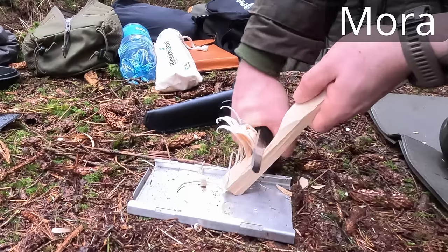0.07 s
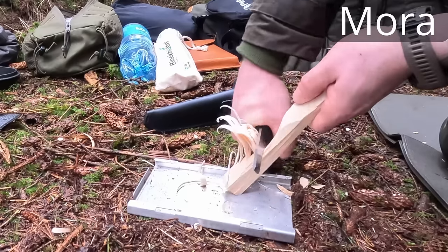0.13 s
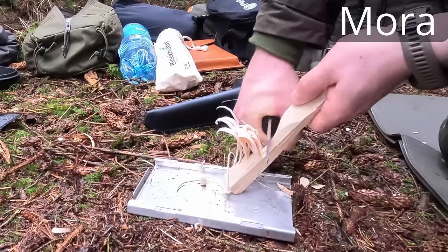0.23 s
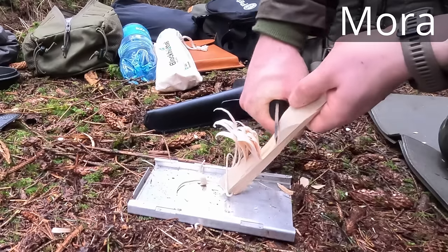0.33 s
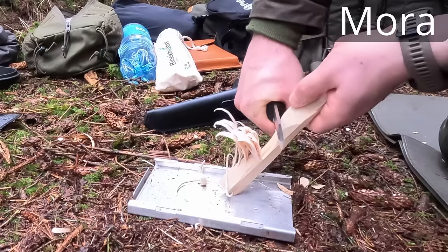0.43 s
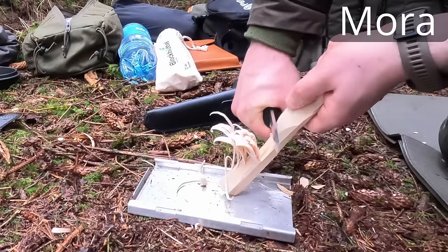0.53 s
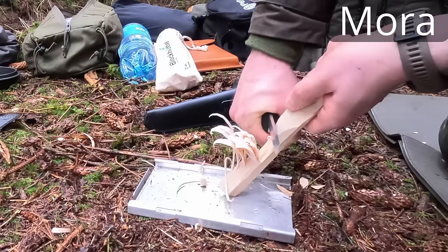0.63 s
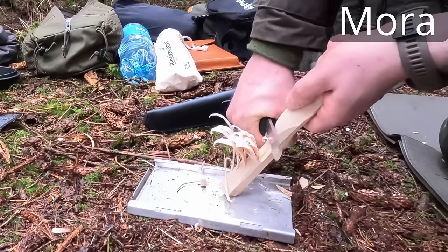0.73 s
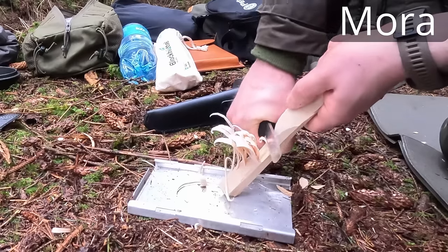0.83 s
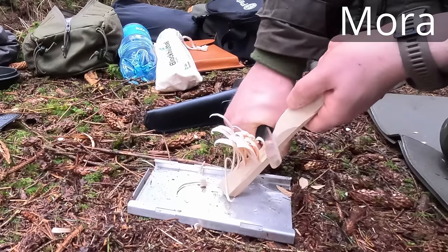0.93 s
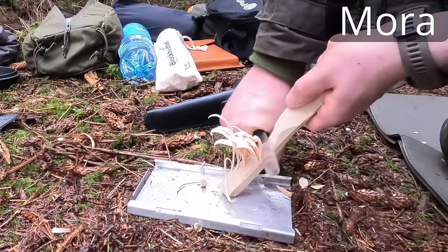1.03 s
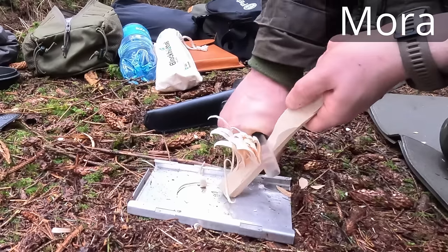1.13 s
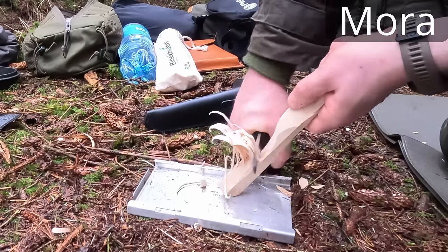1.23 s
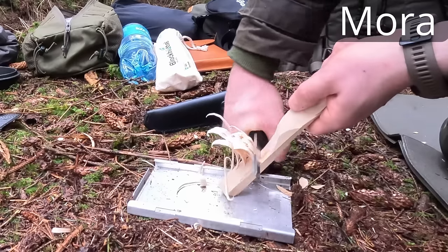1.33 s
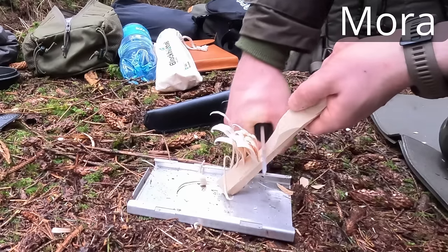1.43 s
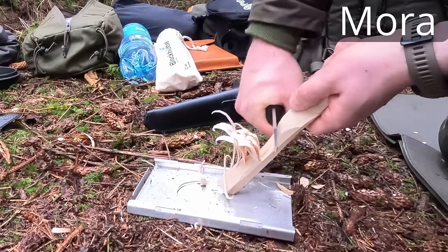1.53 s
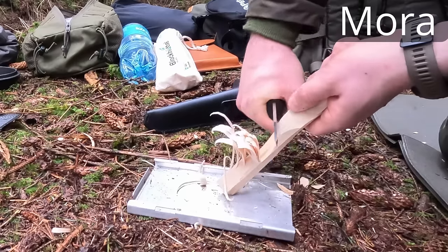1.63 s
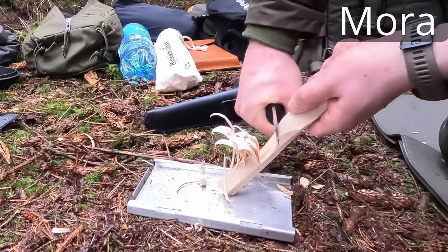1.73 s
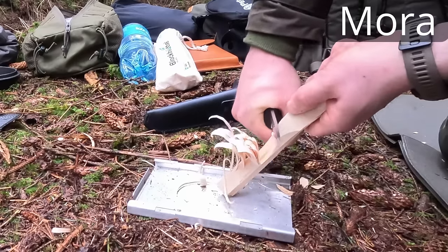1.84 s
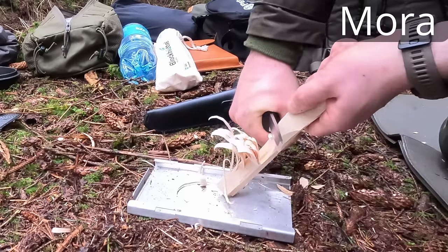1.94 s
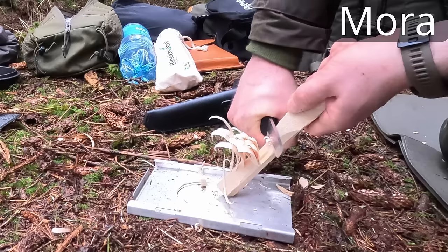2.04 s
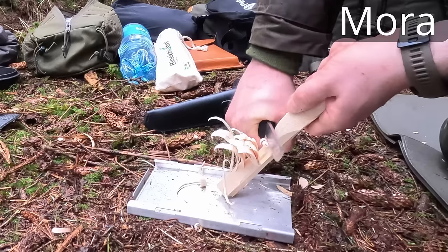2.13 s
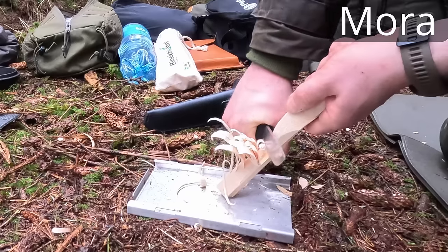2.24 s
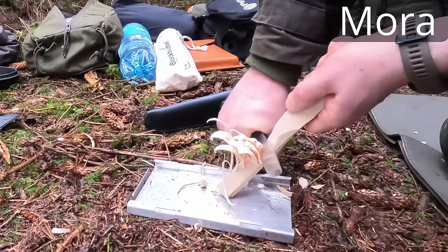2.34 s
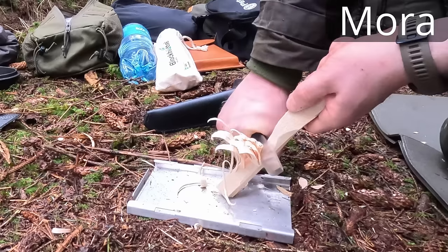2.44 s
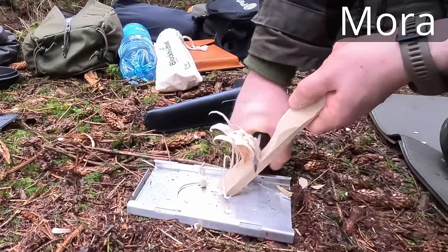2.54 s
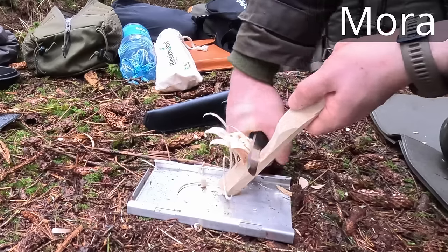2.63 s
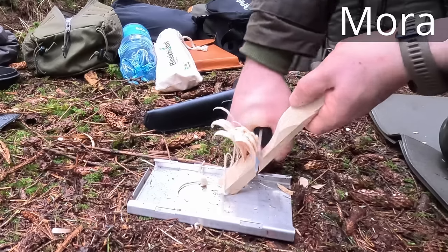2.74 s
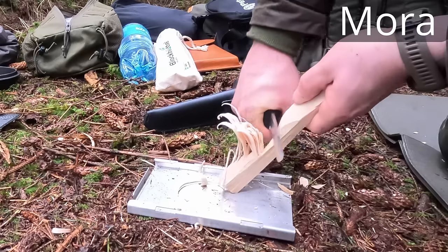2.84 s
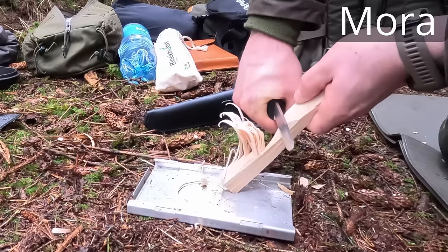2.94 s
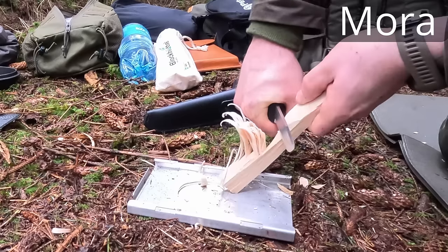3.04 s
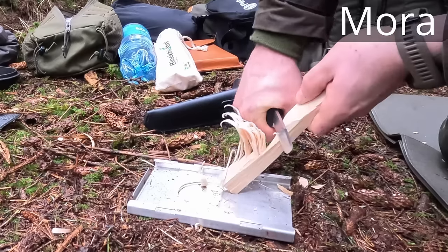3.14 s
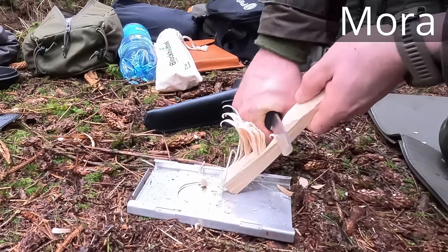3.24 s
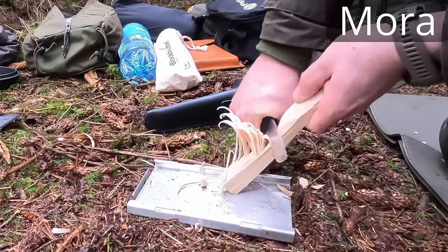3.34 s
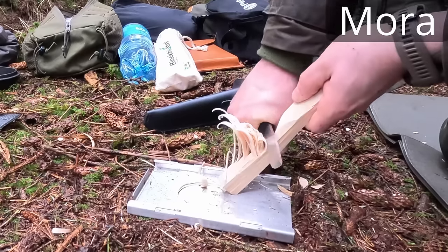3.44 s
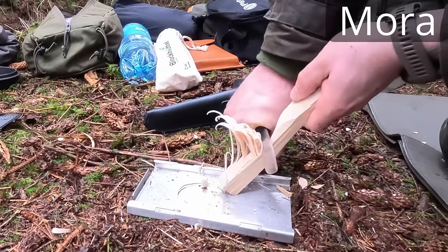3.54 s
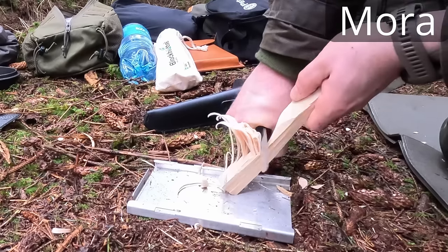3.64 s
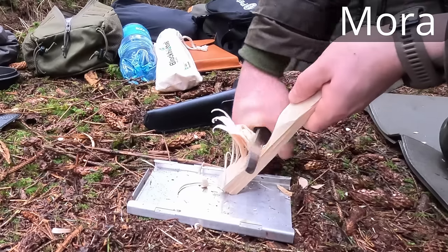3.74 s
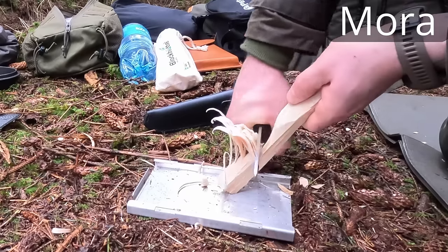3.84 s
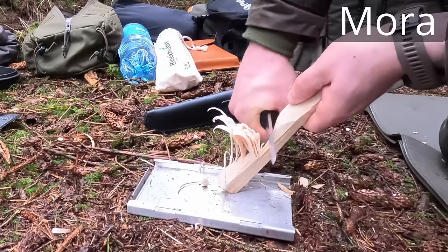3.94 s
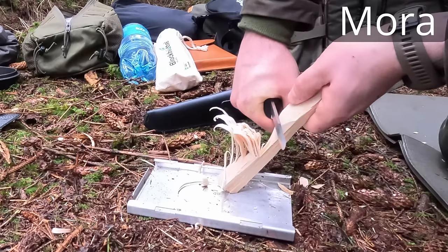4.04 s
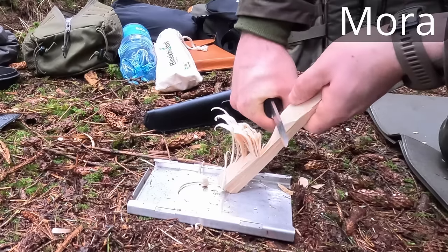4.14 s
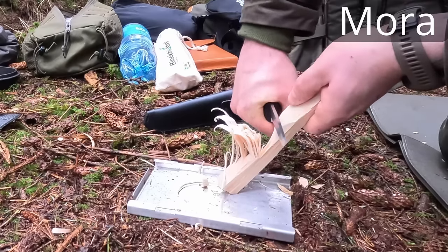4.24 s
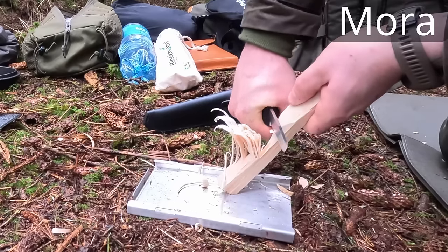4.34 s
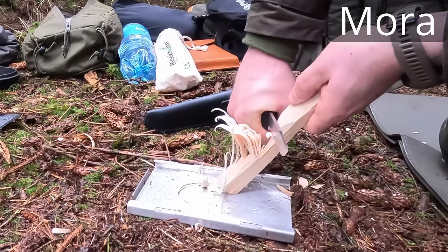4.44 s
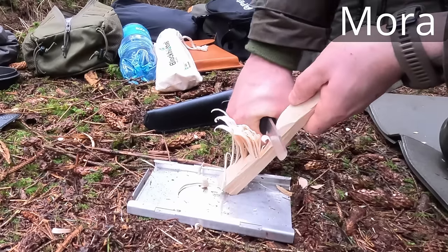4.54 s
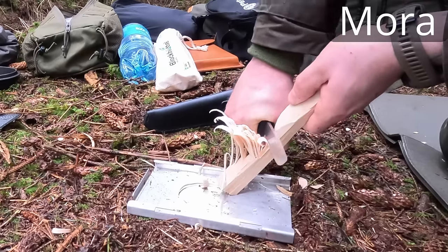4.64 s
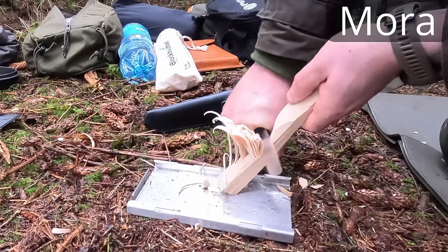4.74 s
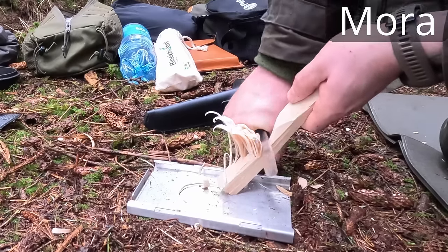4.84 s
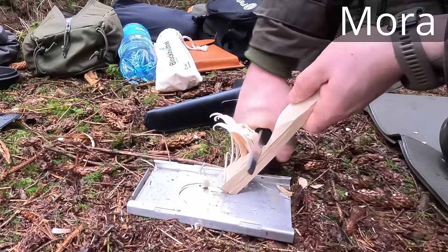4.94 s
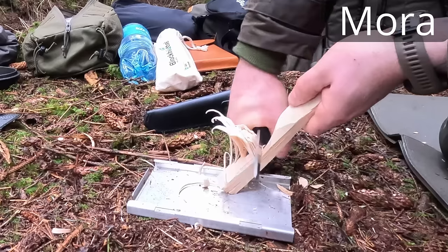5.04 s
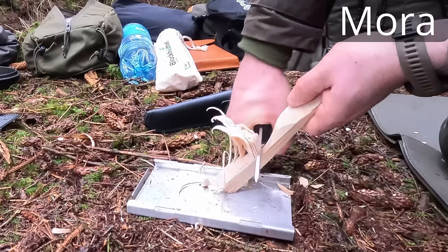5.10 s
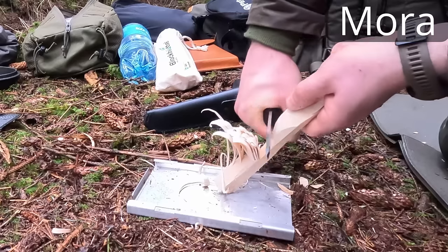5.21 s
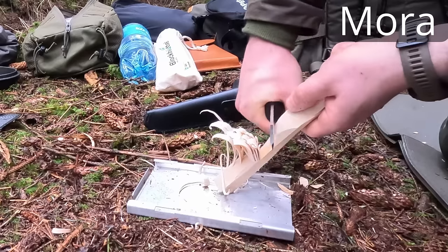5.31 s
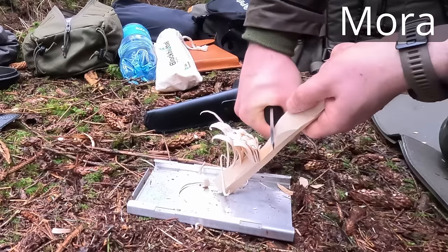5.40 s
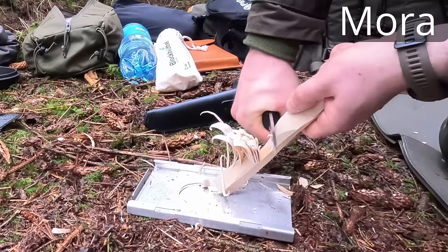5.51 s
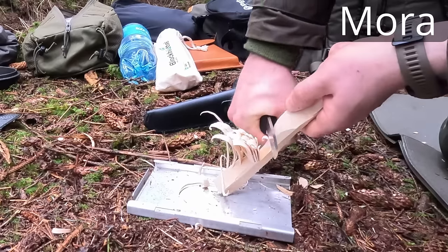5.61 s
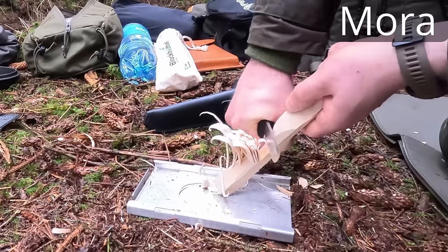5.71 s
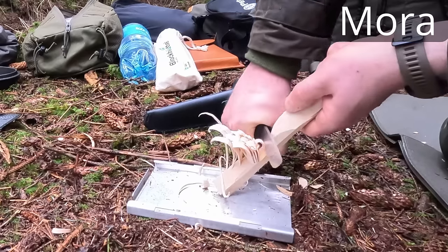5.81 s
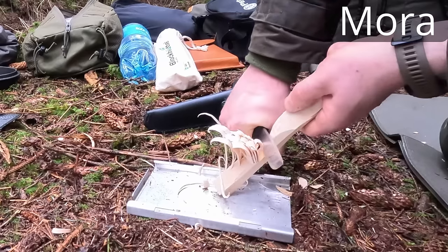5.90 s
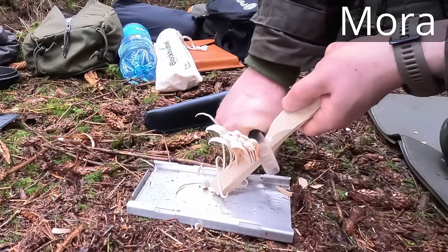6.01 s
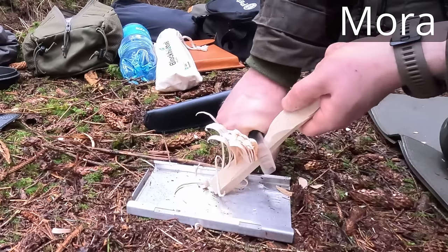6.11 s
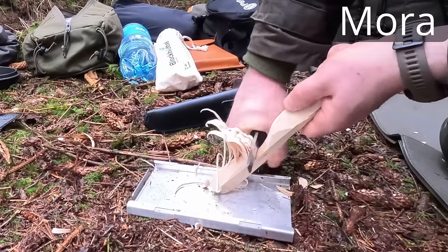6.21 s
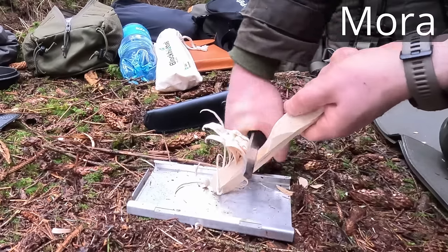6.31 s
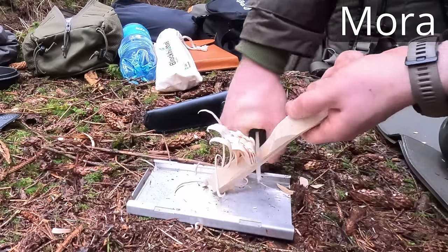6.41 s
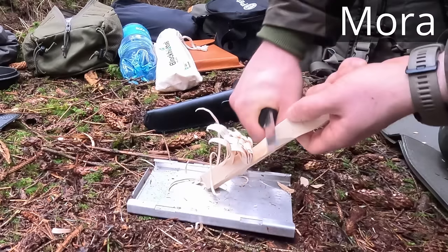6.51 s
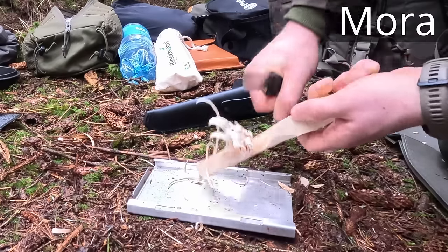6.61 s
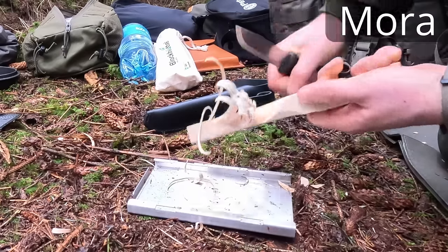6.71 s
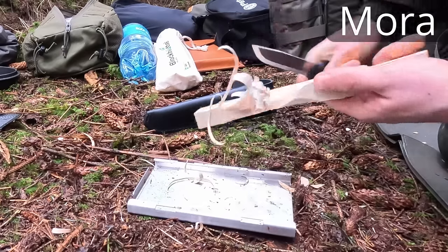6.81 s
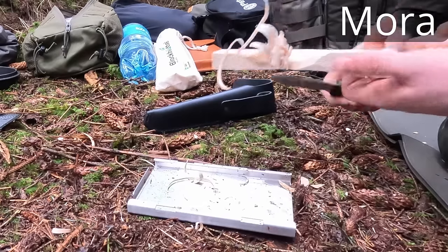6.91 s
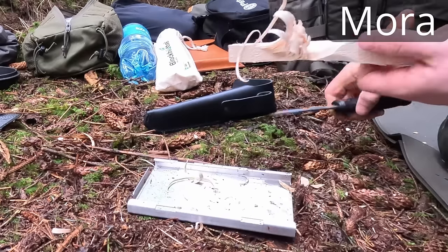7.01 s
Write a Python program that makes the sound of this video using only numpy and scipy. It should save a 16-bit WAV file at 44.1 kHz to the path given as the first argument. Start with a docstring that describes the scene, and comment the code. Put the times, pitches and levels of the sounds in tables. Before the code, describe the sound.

A knife shaves curls off a wooden stick in rasping, crackling strokes, with a small bird calling briefly over a steady low forest rumble.

```python
"""A small bird calls over a steady forest rumble and stops by 1.7 s. From 0.6 s a knife shaves curls down
a wooden stick whose foot rests on a metal tray, in five strokes and a last short push at 6.1 s. The edge
sticks and slips: each slip tears fibres, rings the stick and tray and thumps the soft ground. After each
stroke dry curls tick and the blade slides back. From 6.6 s a sleeve rustles as the stick is lifted."""
import sys
import numpy as np
from scipy import signal
from scipy.fft import rfft, irfft, next_fast_len
from scipy.io import wavfile
from scipy.ndimage import uniform_filter1d

SR = 44100
rng = np.random.default_rng(int(sys.argv[2]) if len(sys.argv) > 2 else 0)


def transcribe(signal):
    """Save signal, clipped to [-1, 1], as a 16-bit WAV file at the path in sys.argv[1]."""
    frames = np.atleast_2d(signal).T
    limited = np.clip(frames, -1, 1)
    pcm = np.round(limited * 32767).astype(np.int16)
    wavfile.write(sys.argv[1], SR, pcm)


N = 311346
TIME = np.arange(N) / SR
BLOW = 6000  # samples per impact

# knife pushes: start/s, end/s, drag/dB, chatter/dB, splintering/dB
STROKES = [(0.642, 1.214, -47.5, -64, 1), (1.899, 2.495, -42, -69, -0.5), (3.169, 3.666, -50, -49.5, -5),
           (4.386, 4.908, -45.5, -49, -3), (5.561, 5.972, -42.5, -69, -8.5)]
# loudest slips of the edge: t/s, rise/s, strength/dB, hardness/dB
SLIPS = [(0.663, 0.0036, -32, -5), (0.686, 0.0075, -35, 0), (0.7844, 0.0033, -32.5, -2),
         (.8145, 0.0022, -29.5, -1), (0.8372, 0.0055, -29.5, -2), (0.8759, 0.0026, -31, 11),
         (0.934, 0.0047, -35.5, 7), (1.0209, 0.0047, -30.5, -0.5), (1.0619, 0.0027, -37, 10),
         (1.1263, 0.0019, -29, 3), (1.1662, 0.0013, -30, 7.5), (1.1711, 0.0041, -34, -12),
         (1.9018, 0.0038, -42.5, -3), (1.9392, 0.0023, -32, -1), (1.9475, 0.0012, -39, 5),
         (1.9633, 0.00082, -27.5, 5), (1.9768, 0.0011, -23, 0), (1.9995, 0.0018, -20.5, 5.5),
         (2.016, 0.0015, -44, 4), (2.0294, 0.0016, -47, 0), (2.0634, 0.0025, -25, -0.5),
         (2.0858, 0.0011, -35, -1), (2.095, 0.00165, -29.5, 0), (2.1129, 0.0014, -27, 4),
         (2.1341, 0.0021, -25, 7.5), (2.158, 0.0017, -28.5, 3), (2.1814, 0.0024, -29.5, 3),
         (2.2107, 0.0015, -27.5, -2), (2.2635, 0.0024, -38, -9), (2.298, 0.0019, -26, 9.5),
         (2.3811, 0.0032, -31.5, 4), (2.4423, 0.0034, -23.5, 4.5), (2.457, 0.003, -43, 7),
         (2.4731, 0.0036, -41.5, 10), (3.2067, 0.00082, -37, -3), (3.2183, 0.0033, -37.5, -14),
         (3.2345, 0.0015, -42, 2), (3.2593, 0.0013, -44, 2), (3.285, 0.0022, -50, 6),
         (3.3394, 0.00149, -30, -11), (3.3924, 0.0019, -32, -7), (3.4386, 0.0024, -29.5, 6),
         (3.4717, 0.0031, -24.5, 10.5), (3.5198, 0.0023, -41, 11), (3.564, 0.0026, -26.5, 15),
         (3.614, 0.0036, -26, 6), (4.359, 0.0013, -39, 0), (4.373, 0.0016, -50, -1),
         (4.397, 0.0017, -35, -11), (4.412, 0.0027, -28, 0), (4.423, 0.0031, -35, -1),
         (4.4458, 0.0044, -30.5, 3), (4.469, 0.0015, -40.5, 5), (4.49, 0.0014, -34, -2),
         (4.5126, 0.0015, -29, -4), (4.547, 0.0034, -22.5, -5), (4.5757, 0.0025, -33, -4),
         (4.5981, 0.0016, -23.5, -0.5), (4.6437, 0.0026, -34, 2), (4.6896, 0.0019, -25.5, -3.5),
         (4.7214, 0.0022, -40, -1), (4.7506, 0.0012, -23.5, 4), (4.7878, 0.0029, -28, 15),
         (4.851, 0.0033, -23, 10.5), (4.884, 0.0018, -27.5, 1), (5.545, 0.0014, -43, -7),
         (5.568, .0015, -46, -5), (5.5874, 0.0015, -32, 5), (5.5977, 0.0026, -24.5, 1),
         (5.606, 0.0024, -28, 5), (5.624, 0.0048, -31, -2), (5.645, 0.001, -36, -2),
         (5.6595, 0.0018, -35, -2), (5.6768, 0.0016, -24, 2), (5.7, 0.0018, -24, 5),
         (5.725, 0.0013, -28.5, 4), (5.7477, 0.0017, -26, 5), (5.774, 0.0017, -32.5, -4),
         (5.792, 0.0018, -33, 4), (5.8138, 0.0041, -36.5, -5), (5.8696, 0.0013, -35.5, -10),
         (5.896, 0.0028, -34.5, 7), (5.9369, 0.0025, -26, -3.5), (5.957, 0.0026, -38, -1),
         (6.069, 0.0037, -32, -0.5), (6.1018, 0.0054, -33.5, 6.5)]
def slips(reference_db=-30, detune=0.021, body_lag_s=0.0012, thump_lag_s=0.0034):
    """Each slip tears a run of fibres; the jolt travels down the stick into the tray and the ground."""
    out = np.zeros(N)
    for t, rise_s, strength_db, hardness_db in SLIPS + small_slips():
        (*_, splinter_db), along = progress(t)
        effort_db = strength_db - reference_db
        # late slips thump, ring and splinter more; hard ones trade low body for ring and rasp
        rasp_db = -43 + 4 * along + effort_db + 0.06 * hardness_db
        fizz_db = -60.5 + 21.5 * along ** 1.44 + 0.94 * effort_db + splinter_db
        jolt_db = -42.5 - 11 * along + effort_db
        note_db = -37.5 + 1.5 * along + effort_db + 0.54 * hardness_db
        body_db = -29 - 5 * along + effort_db - 0.4 * hardness_db
        thump_db = -35 + 14 * along + 0.63 * effort_db
        tear, kicks = tear_force(rise_s, along), kick_force(0.45 * rise_s)
        stretch = 1 + detune * rng.standard_normal(3)
        add(out, t - BLOW / SR, burst(rasp(tear, stretch[0]), rasp_db))
        add(out, t - BLOW / SR, burst(fizz(tear), fizz_db))
        add(out, t + 1.1 * rise_s, burst(jolt(), jolt_db))
        add(out, t + 0.9 * rise_s, burst(stick_note(kicks, rise_s, along), note_db))
        add(out, t + body_lag_s, burst(body(kicks, stretch[1]), body_db))
        add(out, t + thump_lag_s, burst(thump(stretch[2] ** 4), thump_db))
    return out


def small_slips(count=6, strength_db=-43, spread_db=7, rise_s=0.00237):
    """Weak slips scattered over every stroke, as rows like SLIPS."""
    rows = []
    for start, end, *_ in STROKES:
        for k in range(count):
            t = start + (end - start) * (k + rng.random()) / count
            offset_db, hardness_db = rng.uniform(-spread_db, spread_db, 2)
            rows.append((t, rise_s, strength_db + offset_db, hardness_db))
    return rows


def tear_force(rise_s, along, lead_s=0.00055, tail_s=0.004):
    """Fibres crackle more and more under strain, then give, BLOW samples in."""
    before_s = (BLOW - np.arange(BLOW)) / SR
    strain = undb(-10) * np.sqrt(along) * np.exp(-before_s / (lead_s + rise_s))
    release = swell(rise_s) + undb(-24) * swell(tail_s)
    return np.r_[strain, release] * fibres(2 * BLOW, 9000, 2.8)


def kick_force(rise_s):
    """The stick feels only a few large kicks, one just as the edge lets go."""
    kicks = swell(rise_s) * fibres(BLOW, 1500, 1.7)
    add(kicks, rise_s, np.array([-6.]))
    return kicks


# stick bending modes: f/Hz, width/Hz, level/dB
BENDING_MODES = [(1212, 61, 4.5), (1590, 78, 5), (1914, 450, -1.5), (2240, 188, 5.5), (2940, 85, 1.5),
                 (3590, 500, -2.5), (4420, 420, -8.5), (5750, 260, -10.5)]
def rasp(tear, stretch, spot_db=2.5):
    """The tear rings the stick; each spot favours other bending modes."""
    modes = [(hz, width, db + spot_db * rng.standard_normal()) for hz, width, db in BENDING_MODES]
    return ring(tear, modes, stretch)


# torn fibre spectrum: f/Hz, level/dB
FIZZ = [(3000, 1), (4700, 6.5), (6000, 8), (7900, 7), (9000, 2), (10500, 1), (12500, -3.5), (14500, -4),
        (16000, -19)]
def fizz(tear):
    """The treble of the tearing fibres runs along the stick."""
    return along_stick(colour(tear, FIZZ))


# release snap spectrum: f/Hz, level/dB
JOLT = [(150, -13.5), (600, 2), (1300, 0.5), (4000, -12), (6000, -24.5), (10000, -27), (16000, -62)]
def jolt():
    """The edge breaks free with one dry snap."""
    return colour(-signal.unit_impulse(BLOW), JOLT)


# modes around the stick's main note (second row): f/Hz, width/Hz, level/dB
NOTE_MODES = [(820, 334, -12.5), (946, 108, 0), (1050, 190, -16.5), (1200, 110, -26)]
def stick_note(kicks, rise_s, along, start_hz=898, climb_hz=45.4, jitter=0.032):
    """The blade's place along the stick shifts its main note."""
    note_hz = (start_hz + climb_hz * along) * (1 + jitter * rng.standard_normal())
    drive = kicks + swell(0.83 * rise_s) * rng.standard_normal(BLOW)
    return ring(drive, NOTE_MODES, note_hz / NOTE_MODES[1][0])


# stick on its tray: f/Hz, width/Hz, level/dB
BODY_MODES = [(183.7, 12, 1), (264.4, 68, -0.5), (296.6, 56.5, 3.5), (360.5, 60, 1), (497.4, 37.7, 2.5),
              (736, 18, -23)]
def body(kicks, stretch):
    """The kicks ring the low modes of stick and tray."""
    return colour(ring(kicks, BODY_MODES, stretch), [(80, -1.5), (180, -5), (750, -9.5), (1500, -18)])


# soft ground: f/Hz, width/Hz, level/dB
GROUND_MODES = [(68.4, 9.3, 2), (108.3, 51, -3.5)]
def thump(stretch, push_s=0.0016):
    """The tray pushes into the ground."""
    return ring(-swell(push_s), GROUND_MODES, stretch)


# curl cracks and blade touchdowns: t/s, level/dB, brightness/dB, knock/dB
TICKS = [(0.071, -42, -0.5, -61), (0.126, -61.5, 3, -73), (0.2181, -29, 0.5, -41.5), (1.3159, -51, -2, -66),
         (1.331, -52, 6, -69), (1.3838, -37, 1, -47), (2.48, -48.5, 9, -45), (2.676, -46, -8, -56),
         (2.685, -38, -7.5, -49), (2.733, -44, 1.5, -57), (2.754, -55, 12, -52), (2.8743, -55, -8, -66),
         (3.652, -40.5, -2, -51), (3.676, -48, -4, -56), (3.786, -36, -0.5, -30), (3.796, -43.5, 4.5, -60),
         (3.829, -42.5, -7, -47), (3.962, -56.5, -7, -69), (4.8143, -49, -6, -58), (4.927, -46, -6, -55),
         (5.0378, -32, -3.5, -45), (5.076, -31.5, -0.5, -44), (5.1099, -37.5, -8.5, -58),
         (6.153, -41.5, 1, -49), (6.3302, -35.5, -3.5, -49), (6.338, -43.5, 4.5, -59),
         (6.3761, -38, -4.5, -51), (6.3974, -38, 0, -45), (6.44, -52, 5.5, -62), (6.46, -56, -5, -60)]
# spectra of a curl's snap and its brighter crack: f/Hz, level/dB
SNAP = [(1500, -9.5), (2500, 11.5), (3500, 17.5), (4500, 20), (5700, 16), (8000, -34.5)]
CRACK = [(3000, -19), (4700, 13), (6200, 0), (7900, 0.5), (9000, -8.5), (10500, -7), (12500, -11),
         (14500, -17), (16000, -36)]
def ticks(rise_s=0.00095, crumble_s=0.006):
    """Dry curls snap and knock on the stick: a crack with a short crumble behind it."""
    out = np.zeros(N)
    for t, db, bright_db, knock_db in TICKS:
        force = (swell(rise_s) + undb(-20) * swell(crumble_s)) * fibres(BLOW, 14000, 2.4)
        add(out, t, burst(ring(force, [(288, 200, 0), (504, 160, 0), (1025, 200, 0)]), knock_db - 3))
        add(out, t, burst(ring(force, [(1390, 170, 0.5), (2170, 1000, 4.6)]), knock_db - 1.5))
        add(out, t, burst(colour(force, SNAP), db - bright_db / 2))
        add(out, t, burst(colour(force, CRACK), db + bright_db / 2))
    return out


# short hiss from rustling curls, stroke ends and one last short knife push: centre/s, length/s, level/dB
HISS_SWELLS = [(.075, 0.14, -51.5), (.22, 0.15, -59), (1.18, 0.061, -57), (1.38, 0.17, -54.5),
               (2.46, 0.083, -51), (2.69, 0.15, -54), (3.63, 0.082, -54), (3.795, 0.095, -54),
               (4.88, 0.098, -55), (5.06, 0.16, -50), (6.11, 0.19, -64), (6.365, 0.21, -53)]
# light blade passes between strokes: centre/s, length/s, hiss/dB, drag/dB
RETURNS = [(.42, 0.65, -59.5, -54), (1.61, 0.33, -54, -54), (2.91, 0.36, -58, -53.5),
           (3.99, 0.37, -59, -52), (5.28, 0.34, -56.5, -58), (6.57, 0.35, -56.5, -53.5)]
# stick under the dragging edge: f/Hz, width/Hz, level/dB
SCRAPE_MODES = [(673, 390, 1), (935, 170, 10), (1270, 370, -0.5), (1840, 320, -0.5), (2950, 130, -13),
                (3790, 1050, -5)]
# sliding steel spectrum: f/Hz, level/dB
HISS = [(900, -5), (2000, 6), (3600, 7.5), (5200, 2), (7800, -2.5), (9000, -7), (10500, -7.5), (12500, -11),
        (14300, -15), (16000, -19)]
def slide(floor_db=-80, sag_db=-5, grip_db=3, grip_hz=110):
    """Steel grinds over the grain, gripping unevenly, with short extra swells of hiss."""
    hiss_gain = undb(floor_db) + passes(HISS_SWELLS) + passes(RETURNS)
    drag_gain = passes(RETURNS, column=3)
    for start, end, drag_db, _, splinter_db in STROKES:
        push = pressure(start, end)
        hiss_gain += push * undb(-55 + 0.73 * splinter_db)
        drag_gain += push * undb(drag_db + sag_db * ramp(start, end))  # eases as the curl peels
    grain = fibres(N, 6000, 1.5) * undb(grip_db * walk(grip_hz))
    # small catches of the edge make the drag irregular
    catches = signal.fftconvolve(np.abs(fibres(N, 90, 1)), swell(.001))[:N]
    splinters = unit(catches * rng.standard_normal(N))
    drive = unit(grain) + undb(-3) * splinters
    wood = unit(ring(drive, BODY_MODES)) + undb(-2) * unit(ring(drive, SCRAPE_MODES))
    wood += undb(-11) * noise(HISS, along_stick(splinters))
    hiss = noise(HISS, along_stick(grain, rebound=0.13, trip_hz=1980))
    return (hiss * hiss_gain + wood * drag_gain) * moving()


def skids(bite_hz=2330, skate_hz=3800, fade_s=0.42, grip_db=7.5, grip_hz=150):
    """Steel chatters over the fibres: low as it bites, higher as it peels the curl or skates back."""
    grit = fibres(N, 5000, 1.7) * undb(grip_db * walk(grip_hz))
    bite_gain, skate_gain = np.zeros(N), passes(RETURNS) * undb(-8)
    for start, end, drag_db, chatter_db, _ in STROKES:
        push = pressure(start, end) * np.exp(-np.maximum(TIME - start, 0) / fade_s)
        bite_gain += push * undb(chatter_db)
        skate_gain += push * undb(drag_db - 14)
    return band(grit, bite_hz, 600) * bite_gain + band(grit, skate_hz, 2600) * skate_gain


# edge in the wood: start/s, end/s, level/dB
SLICES = [(0.647, 1.246, -74), (2.062, 2.49, -71), (3.141, 3.68, -68), (4.305, 4.923, -67.5),
          (5.558, 6.001, -66.5)]
# thin blade singing in the cut: f/Hz, width/Hz, level/dB
BLADE_MODES = [(5400, 480, 5), (7340, 690, 3), (8100, 550, 1), (9800, 1000, -0.5), (12500, 1100, -4),
               (14000, 900, -14)]
def slicing(growth_db=3):
    """The edge parts fine fibres and the blade colours their hiss."""
    grain = fibres(N, 14000, 1) * undb(2.5 * walk(70))
    gain = sum(contact(start, end) * undb(db + growth_db * ramp(start, end)) for start, end, db in SLICES)
    return unit(along_stick(ring(grain, BLADE_MODES))) * gain * moving()


# edge stuck fast: centre/s, length/s
STALLS = [(1.961, 0.01), (1.994, 0.013), (2.044, 0.059)]
def moving():
    """Gain of 1 while the edge travels, dipping to 0.2 where it sticks."""
    return 1 - .8 * passes([(t, length_s, 0) for t, length_s in STALLS])


# blade flat on the shavings: start/s, end/s, start f/Hz, end f/Hz, level/dB
RUBS = [(2.897, 2.988, 3820, 3700, -68), (3.165, 3.255, 2320, 2470, -51.5), (5.247, 5.31, 3650, 3500, -59),
        (5.316, 5.422, 6450, 5670, -65.5), (6.57, 6.632, 3970, 3570, -60)]
# light blade touches: centre/s, length/s, level/dB
TOUCHES = [(5.275, 0.058, -48.5)]
def rubs(half_width_hz=380, grip_db=3, grip_hz=120):
    """The rubbing blade whispers in a narrow, gliding band; a light touch stirs the stick's note."""
    grit = signal.sosfilt(signal.butter(2, half_width_hz, fs=SR, output="sos"), rng.standard_normal(N))
    grit = unit(grit * undb(grip_db * walk(grip_hz)))
    out = unit(ring(fibres(N, 6000, 0.92), NOTE_MODES)) * passes(TOUCHES)
    for start, end, start_hz, end_hz, db in RUBS:
        phase = 2 * np.pi * np.cumsum(np.interp(TIME, [start, end], [start_hz, end_hz])) / SR
        out += undb(db) * contact(start, end) * grit * np.sqrt(2) * np.cos(phase)
    return out


# sleeve envelope: t/s, level/dB
SLEEVE = [(6.62, -56), (6.72, -48), (6.8, -42), (6.9, -43.5), (7.0, -48.5), (7.06, -51.5)]
# cloth spectrum: f/Hz, level/dB
CLOTH = [(150, 1), (300, 12), (1000, 4), (2500, 2), (4500, -4.5), (8000, -13.5), (11000, -19.5),
         (13500, -40), (16000, -40)]
def sleeve():
    """Jacket cloth brushes past as the arms lift, with a thin sizzle on top."""
    sizzle = band(rng.standard_normal(N), hz=13200, width_hz=3000)
    cloth = noise(CLOTH, rng.standard_normal(N)) + undb(-24) * sizzle
    return cloth * undb(np.interp(TIME, *np.transpose(SLEEVE), left=-120) + 1.2 * walk(45))


# whistles: t/s, length/s, f/Hz, glide/(Hz/s), level/dB
WHISTLES = [(0.032, 0.046, 7450, -17000, -49), (0.194, 0.074, 7590, 3, -45), (0.299, 0.1, 7780, 1998, -45)]
# down-slurs: t/s, length/s, top f/Hz, fall/(Hz/s), level/dB, fade/dB
SLURS = [(0.525, 0.096, 6560, 61000, -43, 5.5), (0.701, 0.086, 6100, 42000, -45, 5)]
# chirps: t/s, length/s, arch f/Hz, arch level/dB, flick f/Hz, flick level/dB, flick length/s
CHIRPS = [(1.161, 0.026, 3510, -46, 4670, -48, 0.027), (1.261, 0.035, 3895, -47, 5300, -55, .018),
          (1.348, 0.026, 3370, -49, 4720, -50, .028), (1.451, 0.03, 3650, -44, 5050, -51, 0.02),
          (1.539, 0.031, 3260, -45.5, 4400, -45.5, .06), (1.64, 0.052, 3650, -49.5, 4380, -65, .028)]
def bird(scoop_s=0.0055, lowest_hz=3280, flick_lag_s=0.017):
    """Scooped whistles, down-slurs, then two-voiced chirps, scattered by near twigs and far trunks."""
    out = np.zeros(N)
    wobble_hz = 90 * walk(450)

    def sing(t, hz, db, octave_gain=0):
        u = np.linspace(0, 1, len(hz))
        phase = 2 * np.pi * np.cumsum(hz + wobble_hz[int(t * SR):][:len(hz)]) / SR
        envelope = undb(db - 1) * 2 * np.sqrt(2 * u * (1 - u))
        add(out, t, envelope * (np.sin(phase) + octave_gain * np.sin(2 * phase)))

    for t, length_s, hz, glide, db in WHISTLES:
        age = clock(length_s)
        sing(t, hz * (1 - 0.49 * np.exp(-age / scoop_s)) + glide * age, db)
    for t, length_s, hz, fall, db, fade_db in SLURS:
        age = clock(length_s)
        sing(t, np.maximum(hz - fall * age, lowest_hz), db - fade_db * age / length_s)
    for t, length_s, arch_hz, arch_db, flick_hz, flick_db, flick_s in CHIRPS:
        arch = 1 - 0.112 * np.linspace(-1, 1, int(length_s * SR)) ** 2
        flick = 1 - 0.0525 * np.linspace(-1, 1, int(flick_s * SR))
        sing(t, arch_hz * arch, arch_db, octave_gain=undb(-18))
        sing(t + flick_lag_s, flick_hz * flick, flick_db)
    return out + undb(-6) * scatter(out, t60_s=0.028) + undb(-8) * scatter(out, t60_s=0.42)


# forest spectrum: f/Hz, level/dB
FOREST = [(15, -5), (28, 4.5), (48, 2.5), (75, -3), (110, -7), (170, -8), (260, -14.5), (400, -22.5),
          (700, -25), (1000, -25), (1600, -30), (2500, -40), (3800, -53), (7000, -58), (16000, -82)]
def forest(level_db=-35):
    """A steady far rumble with a soft hush above it."""
    drift_db = .5 * walk(5)
    return noise(FOREST, rng.standard_normal(N)) * undb(level_db + drift_db)


def along_stick(x, rebound=0.34, trip_hz=720):
    """Treble runs to the end of the stick and back repeatedly, leaving evenly spaced resonances."""
    size = next_fast_len(len(x))
    trip = np.exp(-2j * np.pi * np.fft.rfftfreq(size, 1 / SR) / trip_hz)
    return irfft(rfft(x, size) / (1 - rebound * trip), size)[:len(x)]


def scatter(x, t60_s):
    """Diffuse decaying echoes at unit energy gain."""
    t = clock(0.5)
    echoes = rng.standard_normal(len(t)) * np.exp(-np.log(1000) * t / t60_s)
    return signal.fftconvolve(x, echoes / np.linalg.norm(echoes))[:N]


def widen(mid, phase_rad=1.25):
    """Centred stereo; only the highest treble spreads, leaning left."""
    side_spectrum = [(100, -75), (700, -51), (1400, -39), (2800, -35), (5600, -25), (9500, -19),
                     (11000, -11), (12300, 3), (16000, 3)]
    size = next_fast_len(N)
    shimmer = 1 + .5 * walk(250)
    response = np.exp(1j * phase_rad) * bin_gains(side_spectrum, size)
    side = irfft(rfft(mid * shimmer, size) * response, size)[:N]
    return np.array([mid + side, mid - side])


def progress(t):
    """The nearest stroke and the blade's travel through it, 0-1."""
    stroke = min(STROKES, key=lambda row: abs(t - (row[0] + row[1]) / 2))
    return stroke, ramp(stroke[0], stroke[1], t)


def ramp(start, end, t=TIME):
    """0 at start to 1 at end."""
    return np.clip((t - start) / (end - start), 0, 1)


def pressure(start, end, bite_s=0.028, lift_s=0.016):
    """The hand leans on the knife, holds and lets go."""
    return (1 + np.tanh((TIME - start) / bite_s / 2)) * (1 + np.tanh((end - TIME) / lift_s / 2)) / 4


def contact(start, end, land_s=.004, leave_s=0.0086):
    """Steel meets the wood abruptly and leaves more gently."""
    return ramp(start, start + land_s) * (1 - ramp(end - leave_s, end))


def passes(rows, column=2):
    """Gain of light touches that swell and fade."""
    return sum(undb(row[column]) * np.cos(np.pi * np.clip((TIME - row[0]) / row[1], -.5, .5))
               for row in rows)


def swell(rise_s):
    """Force that builds over the rise time and dies away."""
    u = TIME[:BLOW] / rise_s
    return u * np.exp(1 - u)


def fibres(size, per_s, spread_db):
    """Tiny fractures of uneven strength, rms 1."""
    fractures = (rng.random(size) < per_s / SR) * rng.standard_normal(size)
    return unit(fractures * undb(spread_db * np.clip(rng.standard_normal(size), -2, 2)))


def walk(rate_hz):
    """Random steps smoothed twice, rms 1."""
    hold = int(SR / rate_hz)
    steps = np.repeat(rng.standard_normal(N // hold + 1), hold)
    return unit(uniform_filter1d(uniform_filter1d(steps, hold), hold)[:N])


def ring(x, modes, stretch=1):
    """Damped resonances (f/Hz, width/Hz, level/dB), all detuned by one factor."""
    size = next_fast_len(len(x))
    jf = 1j * np.fft.rfftfreq(size, 1 / SR)
    response = sum((-1) ** k * undb(db) * jf * width / (jf ** 2 + jf * width + (hz * stretch) ** 2)
                   for k, (hz, width, db) in enumerate(modes))
    return irfft(rfft(x, size) * response, size)[:len(x)]


def band(x, hz, width_hz):
    """One resonance applied twice, rms 1."""
    mode = [(hz, width_hz, 0)]
    return unit(ring(ring(x, mode), mode))


def bin_gains(points, size):
    """FFT bin gains through (f/Hz, level/dB) points."""
    hz, db = np.transpose(points)
    f = np.maximum(np.fft.rfftfreq(size, 1 / SR), 1)
    return undb(np.interp(np.log(f), np.log(hz), db))


def colour(x, points):
    """Minimum-phase filter through (f/Hz, level/dB) points."""
    cepstrum = irfft(np.log(bin_gains(points, len(x))), len(x))
    cepstrum[1:] *= 2
    cepstrum[len(x) // 2:] = 0
    return irfft(rfft(x) * np.exp(rfft(cepstrum)), len(x))


def noise(points, source):
    """A coloured stream of N samples, rms 1."""
    return unit(colour(np.resize(source, next_fast_len(N)), points)[:N])


def burst(x, db, window_s=.01):
    """Give a short sound the energy of window_s at this level."""
    return x * undb(db) * np.sqrt(window_s * SR / np.sum(x ** 2))


def add(out, t, x):
    """Mix x in at t seconds."""
    i = max(int(t * SR), 0)
    out[i:i + len(x)] += x[:max(len(out) - i, 0)]


def clock(length_s):
    return TIME[:int(length_s * SR)]


def undb(db):
    return 10 ** (np.asarray(db) / 20)


def unit(x):
    return x / np.sqrt(np.mean(x ** 2))


def scene(echo_db=-27):
    """Close handwork with a faint echo off the trees, the bird and the forest."""
    work = slips() + ticks() + slide() + skids() + slicing() + rubs() + sleeve()
    return widen(work + undb(echo_db) * scatter(work, t60_s=0.4) + bird() + forest())


def record(dry):
    """Steep low-pass at 15.9 kHz."""
    return signal.sosfilt(signal.ellip(8, .2, 70, 15900, fs=SR, output="sos"), dry)


dry = scene()
out = record(dry)
transcribe(out)
```